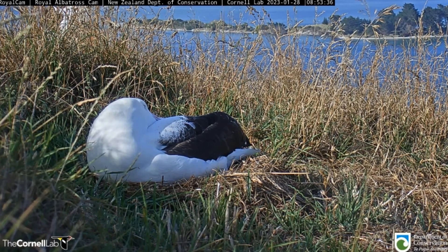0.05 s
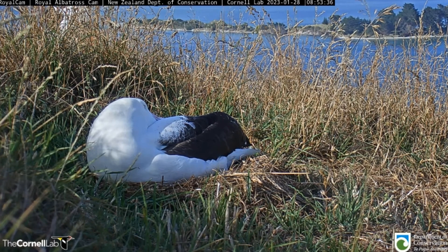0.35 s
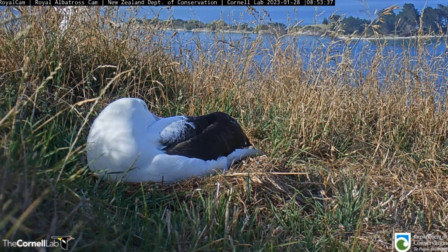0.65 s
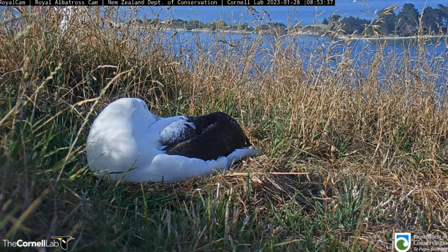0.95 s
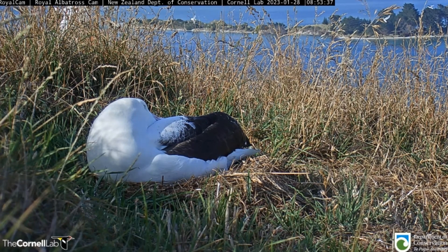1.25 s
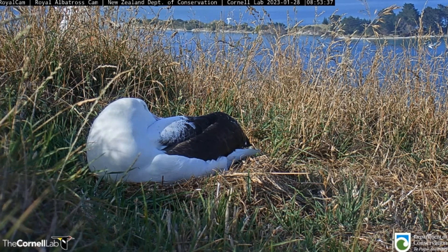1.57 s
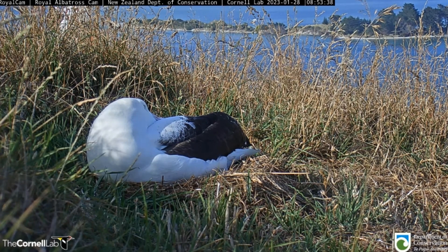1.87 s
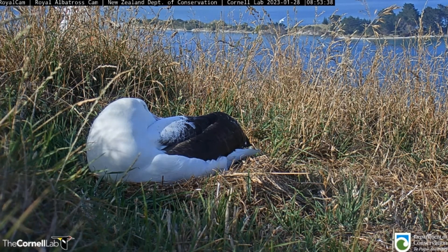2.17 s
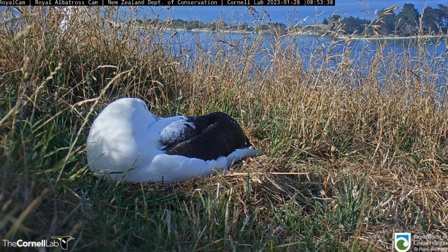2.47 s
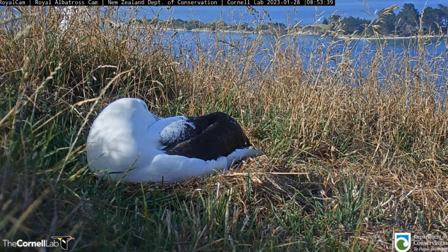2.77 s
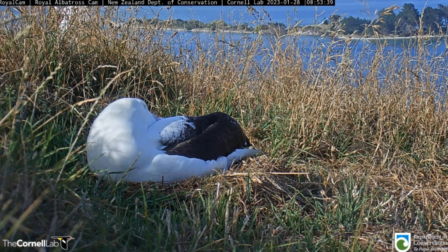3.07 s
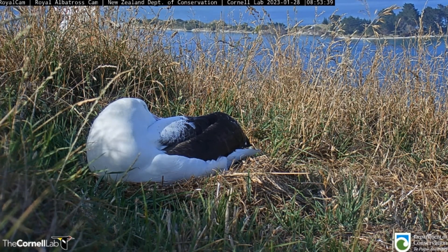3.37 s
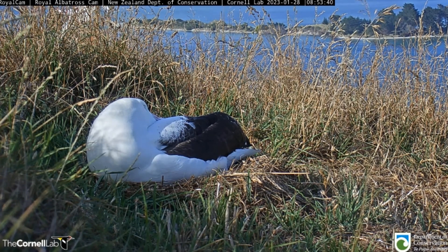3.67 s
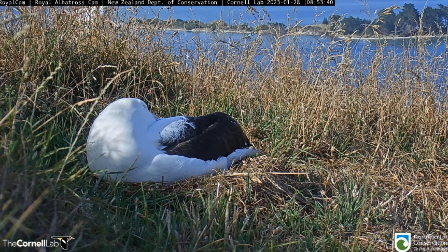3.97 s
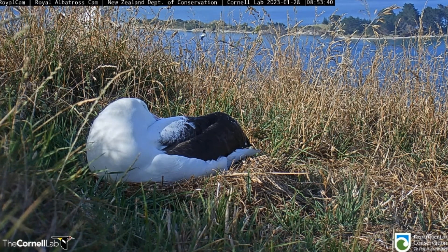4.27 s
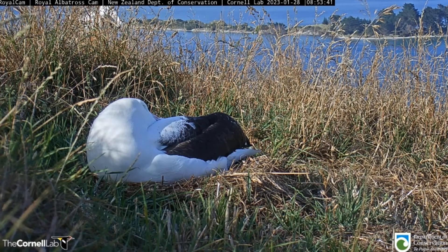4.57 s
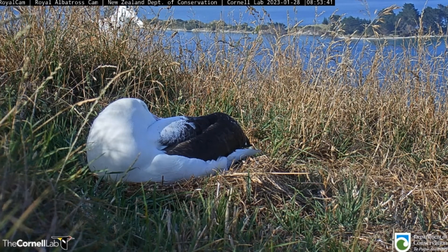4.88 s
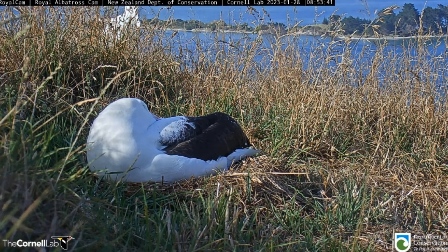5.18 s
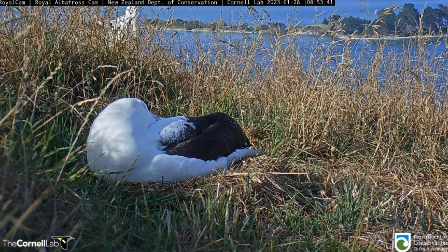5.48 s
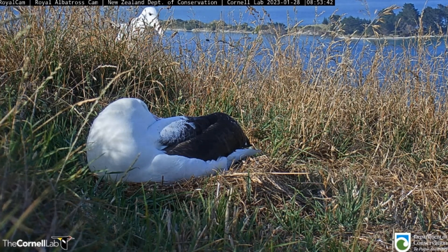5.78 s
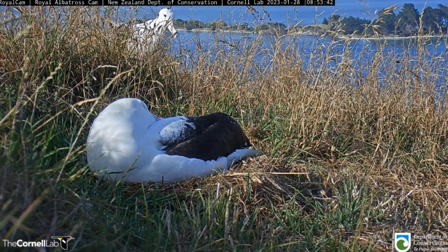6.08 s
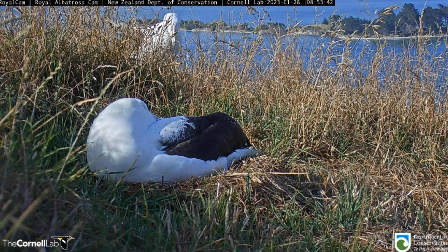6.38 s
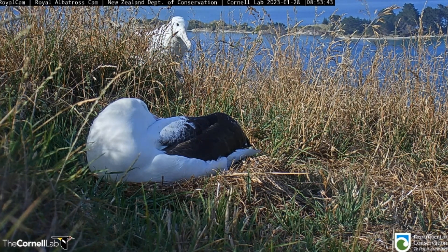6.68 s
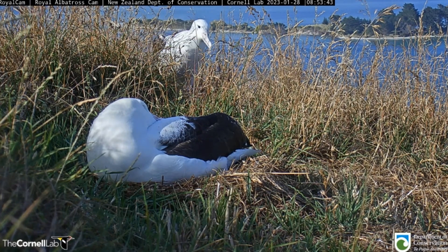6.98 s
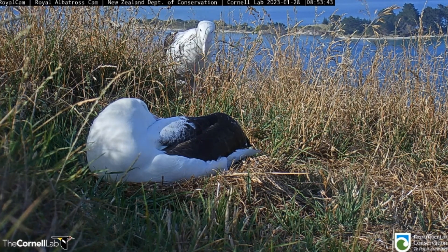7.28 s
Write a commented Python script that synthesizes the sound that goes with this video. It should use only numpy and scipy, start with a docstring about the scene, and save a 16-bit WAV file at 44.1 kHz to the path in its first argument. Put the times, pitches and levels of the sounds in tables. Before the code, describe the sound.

Several gulls squabble close to a fixed microphone on a grassy headland above the sea. Piercing screams and harsh, rattling rasps overlap in short, loud bursts with hardly a pause, and wavering cackles come forward toward the end. Behind them, a distant colony blurs into a bright, restless noise over a low rush of wind and water and a faint machinery hum.

```python
"""Gulls scream and squabble close to a fixed microphone on a grassy headland above the sea.
Each call is a membrane tone near 1.2 kHz, heard mostly in its second and third harmonics and chopped
into pulses: fast in screams and wavering cackles, slower upward chirps in rasps. The calls bounce off
the ground and scatter from the hillside. Behind them are the distant colony, wind and water, and a
faint machinery hum. The sound drops out once, for an instant."""
import sys
import numpy as np
from scipy import signal
from scipy.fft import rfft, irfft, next_fast_len
from scipy.io import wavfile
from scipy.ndimage import uniform_filter1d

SR = 44100
rng = np.random.default_rng(int(sys.argv[2]) if len(sys.argv) > 2 else 0)


def waveform_to_disk(signal):
    """Save audio, clipped to [-1, 1], as 16-bit WAV at the path in sys.argv[1]."""
    frames = np.transpose(np.atleast_2d(signal))
    scaled = np.clip(frames, -1, 1) * 32767
    samples = np.round(scaled).astype(np.int16)
    wavfile.write(sys.argv[1], SR, samples)


N = 323694


def amp(db):
    """Decibels to gain."""
    return 10 ** (np.asarray(db) / 20)


def unit(x):
    """Scales to rms 1."""
    return x / np.sqrt(np.mean(x ** 2) + 1e-20)


def gain_at(spectrum, hz):
    """Gain between rows of frequency_hz, level_db, on a log-frequency axis."""
    f, db = np.transpose(spectrum)
    return amp(np.interp(np.log(hz + 1), np.log(f + 1), db))


def add(mix, start_s, sound):
    """Lays a sound into the mix."""
    part = mix[max(round(start_s * SR), 0):][:len(sound)]
    part += sound[:len(part)]


def wander(size, hz):
    """Random drift of rms about 1, rolling off above hz."""
    f = np.fft.rfftfreq(2 * SR, 1 / SR)
    return unit(irfft(rfft(rng.standard_normal(2 * SR)) / (1 + (f / hz) ** 4)))[:size]


def colour(x, spectrum):
    """Filters a sound by a spectrum."""
    size = next_fast_len(2 * len(x))
    return irfft(rfft(x, size) * gain_at(spectrum, np.fft.rfftfreq(size, 1 / SR)), size)[:len(x)]


def wash(spectrum, level_db, patchy_db, swell_db):
    """Far-off sound: noise with drifting patches and a slow swell."""
    frames, bins = N // 256 + 5, 513
    real, imag, patches = rng.standard_normal((3, frames, bins))
    patches = unit(uniform_filter1d(uniform_filter1d(patches, size=14, axis=0), size=6, axis=1))
    swell = unit(uniform_filter1d(rng.standard_normal(frames), size=70))[:, None]
    spectra = (real + 1j * imag) * amp(patchy_db * patches + swell_db * swell)
    noise = signal.istft(spectra.T, nperseg=1024, noverlap=768)[1][:N]
    return amp(level_db) * unit(colour(noise, spectrum))


def hum():
    """Faint steady tones of machinery."""
    # Hum tones: frequency_hz, level_db
    tones = [(37.7, -54), (120, -67.5), (400, -76), (466, -73), (582, -54.5)]
    t = np.arange(N) / SR
    return sum(amp(db) * unit(np.sin(2 * np.pi * (hz * t + rng.random()))) for hz, db in tones)


def wind_and_water():
    """A low, gently swelling rush around the headland."""
    # Noise spectrum: frequency_hz, relative_db
    rush = [(20, -2.5), (35, 5), (55, 1), (100, -1.5), (170, -6.5), (300, -11), (480, -6), (650, -8),
            (820, -5.5), (1000, -16), (1400, -10), (2000, -14), (4000, -30), (7000, -49)]
    return wash(rush, level_db=-43.0, patchy_db=1.96, swell_db=-1.84)


def colony():
    """Distant gulls blur into a bright, restless band of noise."""
    # Spectrum of the massed voices: frequency_hz, relative_db
    voices = [(1000, -38), (1900, -26.5), (2350, 1.5), (2750, 4.5), (3200, 2.5), (3650, -1.5), (4100, -9.5),
              (4700, -10), (5200, -40.5), (6300, -37), (7300, -42.5)]
    return wash(voices, level_db=-35.5, patchy_db=5.5, swell_db=4)


def hillside(x, ground_s=0.00203, ground_db=-19, scatter_db=-19, t60_s=0.96):
    """The path to the microphone: direct sound, one ground bounce, thin scatter from the slope."""
    t = np.arange(SR // 2) / SR
    taps = rng.standard_normal(len(t)) * (rng.random(len(t)) < 2000 / SR)  # 2000 echoes a second
    taps *= amp(-60 * t / t60_s) * (t > .005)
    taps *= amp(scatter_db) / np.linalg.norm(taps)
    taps[0] = 1
    taps[round(ground_s * SR)] += amp(ground_db)
    return signal.fftconvolve(x, taps)[:N]


def cackle_overtone():
    """A thin, falling high overtone of one near gull's cackle."""
    # Course of the overtone: time_s, frequency_hz, level_db
    course = [(2.66, 4930, -60), (2.72, 4880, -53), (2.81, 4780, -53), (2.86, 4500, -53), (2.94, 4270, -52)]
    times, hz, db = np.transpose(course)
    t = np.arange(N) / SR
    phase = 2 * np.pi * np.cumsum(np.interp(t, times, hz)) / SR
    return amp(np.interp(t, times, db, left=-np.inf, right=-np.inf)) * np.sqrt(2) * np.sin(phase)


def breath(row, bend, slack_db, lesser_lift_db, slack_strain_db, rate_follow, crest_db, crest_hz):
    """A push of air builds, holds and gives out; slack, the voice is lower, softer, slower, coarser."""
    start_s, length_s, rise_s, fall_s, hz0, hz1, db0, db1, rate0, rate1, lesser_db, strain_db = row
    t = np.arange(0, length_s, 1 / SR)
    along = t / length_s
    slack = 1 - (1 - np.exp(-t / rise_s)) * (1 - np.exp((t - length_s) / fall_s))
    droop = 1 - bend * slack
    crest = np.sin(np.pi * along) ** 2  # the push is hardest in the middle
    pitch = (hz0 + (hz1 - hz0) * along + crest_hz * crest) * droop
    rate = (rate0 + (rate1 - rate0) * along) * droop ** rate_follow
    lead_db = db0 + (db1 - db0) * along + crest_db * crest + slack_db * slack ** 2
    partner_db = lead_db + lesser_db + lesser_lift_db * slack  # the other strong harmonic
    return start_s + t, pitch, rate, lead_db, partner_db, strain_db + slack_strain_db * slack


def membrane(t, pitch, rate, second_db, third_db, strain_db, weak_db, weak_lift_db, *, sweep, sag,
             duty, rise, fall, droop, leak, shimmer_db, waver, hiss_db, throat=None, rest_hz=1250):
    """A gull's voice: in each pulse the membrane snaps open, glides up to pitch, sags and shuts."""
    # Air hissing through the throat: frequency_hz, relative_db
    air = [(500, -36), (1000, -40), (1300, -16.5), (1750, -19), (2000, -23.5), (2350, 1), (2900, 10),
           (3700, -2.5), (4500, -11), (5000, -17), (5500, -23.5), (6400, -28), (7300, -52)]
    size = len(t)
    strain = amp(strain_db)  # forcing the voice lifts the hiss and the weak harmonics
    turns = np.maximum(np.cumsum(rate) / SR + .03 * wander(size, 40), 0)
    progress = turns % 1 / duty  # 0 to 1 while open; rise and fall are shares of this span
    strength, detune = rng.standard_normal((100, 2))[turns.astype(int)].T  # one draw a pulse
    opening = np.sin(np.pi / 2 * np.clip(progress / rise, 0, 1)) ** 2
    closing = np.sin(np.pi / 2 * np.clip((1 - progress) / fall, 0, 1)) ** 2
    gate = leak + opening * closing * np.exp(-droop * progress) * amp(shimmer_db * strength)
    # a pitch far above the membrane's resting pitch takes a longer climb
    climb = sweep + np.maximum(1 - rest_hz / pitch, 0)
    glide = 1 - climb * np.exp(-progress / .27) - sag * np.minimum(progress, 1) ** 3
    jitter = 0.012 * detune + waver * np.sqrt(strain) * wander(size, 450)
    hz = pitch * uniform_filter1d(glide + jitter, size=30)
    phase = 2 * np.pi * np.cumsum(hz) / SR
    coarseness = strain * np.hypot(amp(second_db), amp(third_db))
    weak_gains = {k: coarseness * amp(db + weak_lift_db) for k, db in zip((1, 4, 5, 6), weak_db)}
    voice = np.zeros(size)
    for k, gain in {2: amp(second_db), 3: amp(third_db), **weak_gains}.items():
        resonance = gain_at(throat, k * hz) if throat else 1
        voice += gain * unit(gate * resonance * np.sin(k * phase))
    # air rushes through the open membrane, most at the snap of opening
    puff = gate * (1 + 0.5 * np.exp(-progress / 0.34))
    hiss = unit(colour(puff * rng.standard_normal(SR)[:size], air))
    fade = np.clip(np.minimum((t - t[0]) / 0.0034, (t[-1] - t) / 0.0037), 0, 1)
    return (voice + amp(hiss_db) * coarseness * hiss) * fade


def cackles(warble_hz=11.5, first_top_s=0.0258):
    """Nearby warbling cries that steady; the second harmonic flares at each top of the pitch."""
    # One cackle a row: start_s, length_s, rise_s, fall_s, first_pitch_hz, last_pitch_hz,
    # first_level_db, last_level_db, first_pulse_hz, last_pulse_hz, second_over_third_db, strain_db,
    # warble_depth_ratio, warble_s, weak_lift_db
    calls = [ (0.272, 0.58, 0.011, 0.056, 1267, 1242, -30, -31, 90.8, 83.6, -7, -4, 0.049, 0.47, -3.5),
             (1.009, 0.33, 0.025, .04, 1213, 1253, -41, -33, 77.2, 81.4, -2, 1, 0.0039, 0.09, -2),
             (2.698, 0.41, 0.007, 0.011, 1250, 1124, -40.5, -42, 87.2, 76, -12, -18, 0.0076, 0.16, 3),
             (3.346, .26, .004, 0.012, 1356, 1222, -29, -33.5, 84.2, 73, -5, -4, .002, 0.16, 10),
             (5.609, 0.79, 0.007, .09, 1284, 1314, -28.5, -26.5, 91.2, 73.5, -6.5, -5, 0.0562, .46, 1.5),
             (6.654, .545, 0.0077, 0.059, 1326, 1260, -25.5, -24, 90.86, 86.1, -9.5, 0.5, 0.0483, .38, 0.5),
             (7.223, .14, 0.026, 0.0046, 1420, 1443, -31, -38.5, 77.5, 81, -9, 0, 0.004, .1, -1), ]
    # Weak harmonics 1, 4, 5, 6: relative_db
    weak_db = [-26, -27, -41, -43]
    mix = np.zeros(N)
    for *row, depth, warble_s, weak_lift_db in calls:
        t, pitch, rate, third_db, second_db, strain_db = breath(
            row, bend=.14, slack_db=-20.5, lesser_lift_db=7.5, slack_strain_db=3.0,
            rate_follow=1.41, crest_db=0.1, crest_hz=5.4)
        age = t - t[0]
        swing = depth * np.cos(2 * np.pi * warble_hz * (age - first_top_s))
        swing /= 1 + (age / warble_s) ** 29  # the warble stops quickly around warble_s
        pitch *= 1 + swing
        second_db += 108 * swing
        third_db += 17.5 * swing
        add(mix, t[0], membrane(
            t, pitch, rate, second_db, third_db, strain_db, weak_db, weak_lift_db, sweep=0.039, sag=.035,
            duty=.84, rise=0.063, fall=0.3, droop=.2, leak=.07, shimmer_db=0.5, waver=0.019,
            hiss_db=-5.5))
    return mix


def rasps():
    """Nearby rattles, mostly on the third harmonic; each pulse chirps up through the throat's peaks."""
    # One rasp a row: start_s, length_s, rise_s, fall_s, first_pitch_hz, last_pitch_hz, first_level_db,
    # last_level_db, first_pulse_hz, last_pulse_hz, second_over_third_db, strain_db, weak_lift_db
    calls = [ (0.044, .4, .025, 0.047, 1170, 1128, -22, -27, 64.2, 49.3, -3.5, 7, 2.5),
             (0.423, 0.18, .01, .03, 1045, 970, -47, -38, 47.7, 46, 1, -4.5, 4),
             (0.583, 0.44, .05, 0.031, 1100, 1101, -19, -25, 60.23, 43.63, -16.5, 5.5, 0.5),
             (1.238, 0.51, .04, .04, 1121, 1115, -18, -22.5, 57.55, 42.2, -17, 0.5, 4.5),
             (1.815, 0.32, .025, 0.035, 1080, 1105, -21.5, -20, 56.6, 46.94, -12, 7, -5),
             (2.374, 0.34, .035, 0.048, 1100, 1067, -20.5, -23.5, 56.77, 48.4, -15.5, 8.5, -7),
             (2.943, 0.49, .015, 0.042, 1180, 1113, -21.5, -27.5, 62.55, 47, -4.5, 5.5, -2),
             (2.945, 0.37, .02, 0.021, 1360, 1284, -30, -36, 67.45, 59.8, 10, -6, -6),
             (3.52, 0.14, .01, .04, 970, 990, -49.5, -50, 51.8, 49.6, 10.5, 12.5, 8),
             (3.726, 0.4, .022, 0.039, 1100, 1075, -20.5, -21, 63.1, 46.55, -12.5, 1, -3.5),
             (4.138, 0.15, .01, 0.014, 1094, 1110, -52, -55.5, 54, 69, -21, 7, 18),
             (4.312, 0.38, .045, 0.064, 1130, 1105, -20.5, -24, 54.2, 46.04, -11, 4, -6),
             (4.877, 0.4, .025, 0.019, 1140, 1125, -24, -26, 69.8, 49.2, -4, -1, -4.5),
             (5.511, 0.4, .015, 0.057, 1170, 1076, -30.5, -27.5, 75.8, 55.9, -1, -4, 1.5),
             (6.151, 0.49, .03, 0.043, 1105, 1085, -24, -33.5, 68, 84, -10.5, 4, 0.5),
             (7.166, 0.25, .03, 0.0026, 1053, 1152, -38.5, -24, 71.2, 78.3, -8, 9.5, 4), ]
    # Weak harmonics 1, 4, 5, 6: relative_db
    weak_db = [-46, -25, -42.5, -47]
    # Throat resonances: frequency_hz, relative_db
    throat = [(800, -16), (1200, 10), (1800, -25.5), (2050, -11.5), (2250, 7), (2600, 18.5), (3000, 15),
              (3300, 11.5), (3600, -4), (4300, -19.5), (6500, -18)]
    mix = np.zeros(N)
    for *row, weak_lift_db in calls:
        t, pitch, rate, third_db, second_db, strain_db = breath(
            row, bend=.11, slack_db=-15, lesser_lift_db=3.5, slack_strain_db=.5,
            rate_follow=.9, crest_db=-0.16, crest_hz=4)
        add(mix, t[0], membrane(
            t, pitch, rate, second_db, third_db, strain_db, weak_db, weak_lift_db, sweep=.18, sag=0,
            duty=.88, rise=0.092, fall=0.74, droop=0.28, leak=0.16, shimmer_db=1.43, waver=0.011,
            hiss_db=-14, throat=throat))
    return mix


def screams():
    """Piercing, fast-pulsed cries close to the microphone, carried by the second harmonic."""
    # One scream a row: start_s, length_s, rise_s, fall_s, first_pitch_hz, last_pitch_hz, first_level_db,
    # last_level_db, first_pulse_hz, last_pulse_hz, third_over_second_db, strain_db, weak_lift_db
    calls = [ (0.004, 0.4, 0.0044, 0.043, 1170, 1150, -24.5, -26.5, 94, 84.7, -13.5, 5.5, 1),
             (0.711, 0.37, 0.052, 0.045, 1158, 1182, -28.5, -27.5, 88, 90.8, -13, 3, 5.5),
             (1.119, 0.15, .018, 0.036, 1475, 1452, -23.5, -27.5, 96, 120, -24.5, 7, 2.5),
             (1.302, 0.51, .03, 0.045, 1204, 1294, -17, -18, 95.1, 110.6, -24, -1.5, 3),
             (2.098, 0.59, 0.034, 0.062, 1263, 1236, -12.5, -21, 102.5, 96.2, -25, -4.5, 1),
             (3.042, 0.25, 0.0056, 0.016, 1587, 1578, -24, -20, 86.6, 101.6, -29.5, -11, 7.5),
             (3.529, 0.6, .025, 0.026, 1289, 1135, -22, -30.5, 105.6, 88.4, -23, 4.5, 0.5),
             (4.389, .21, 0.0029, 0.022, 1368, 1190, -13.5, -21.5, 95.2, 93.5, -21, 0, 6.5),
             (4.558, .23, .02, .03, 1156, 1243, -25, -27, 91.5, 105, -17, 1, -2),
             (4.694, 0.29, .015, 0.064, 1429, 1460, -26, -19.5, 102, 104, -24.5, 7, -13),
             (5.263, .34, .018, 0.074, 1373, 1275, -21.5, -19, 106.8, 92.6, -28, -3, 2),
             (5.264, 0.17, 0.018, 0.059, 1605, 1646, -26, -27, 105.6, 100, -24.5, 1, 1),
             (5.559, 0.15, 0.013, 0.022, 1233, 1186, -24, -26, 85, 83, -13.5, -0.5, -1.5), ]
    # Weak harmonics 1, 4, 5, 6: relative_db
    weak_db = [-33.5, -42, -47.5, -51]
    mix = np.zeros(N)
    for *row, weak_lift_db in calls:
        t, *controls = breath(
            row, bend=.13, slack_db=-22, lesser_lift_db=23, slack_strain_db=0.5,
            rate_follow=1.1, crest_db=2.0, crest_hz=4.4)
        add(mix, t[0], membrane(
            t, *controls, weak_db, weak_lift_db, sweep=.012, sag=.02, duty=.93, rise=0.26, fall=0.53,
            droop=0.19, leak=0.043, shimmer_db=0.96, waver=.012, hiss_db=-12.5))
    return mix


def scene():
    """Close gulls on the hillside over wind, water, the colony and the hum, in mono."""
    background = wind_and_water() + colony()
    gulls = screams() + rasps() + cackles() + cackle_overtone()
    return (hillside(gulls) + background + hum())[None]


def record(dry, edge_hz=7350):
    """The sound drops out for 3 ms; the microphone's band ends near 7 kHz."""
    t = np.arange(N) / SR
    live = (t < 1.5917) | (t > 1.5947)
    lowpass = signal.firwin(361, edge_hz, window=("kaiser", 8), fs=SR)
    return signal.oaconvolve(dry * live, lowpass[None], "same")


dry = scene()
out = record(dry)
waveform_to_disk(out)
```